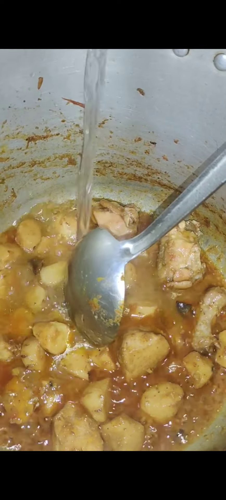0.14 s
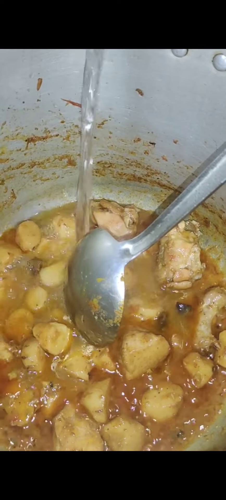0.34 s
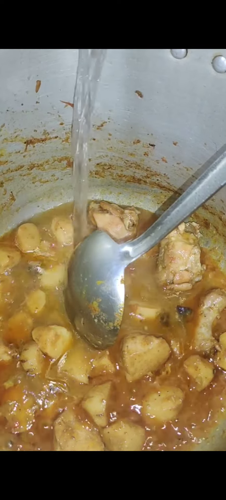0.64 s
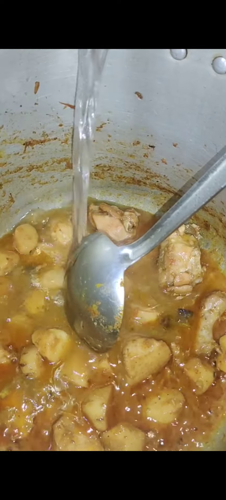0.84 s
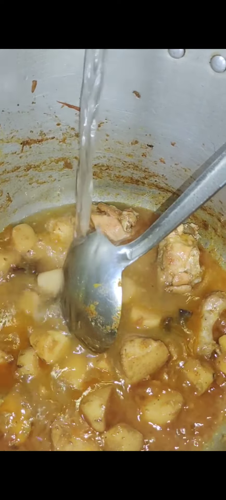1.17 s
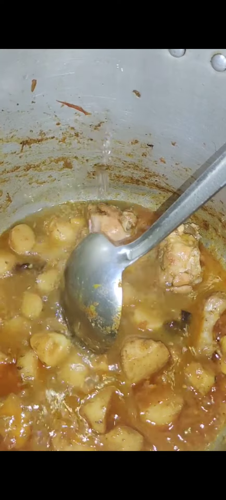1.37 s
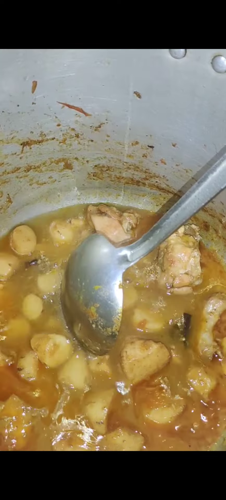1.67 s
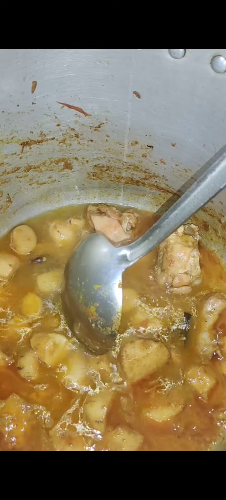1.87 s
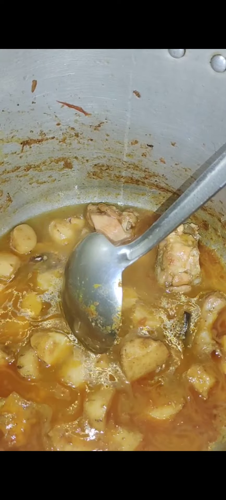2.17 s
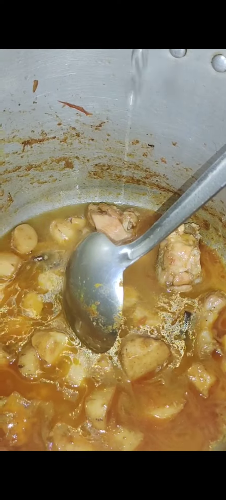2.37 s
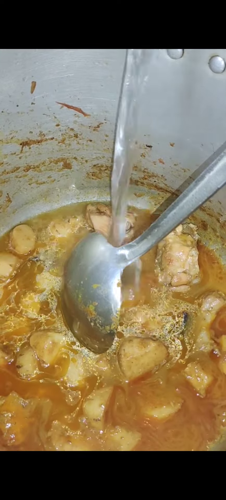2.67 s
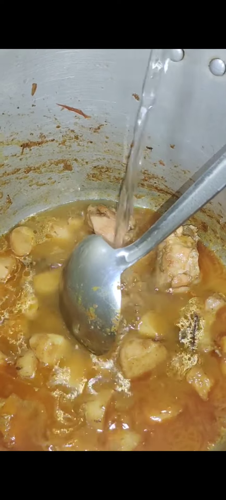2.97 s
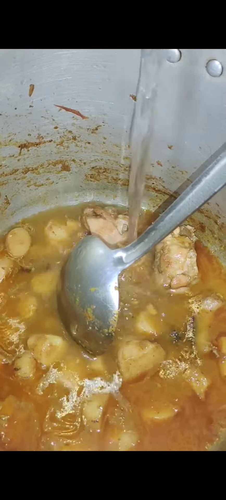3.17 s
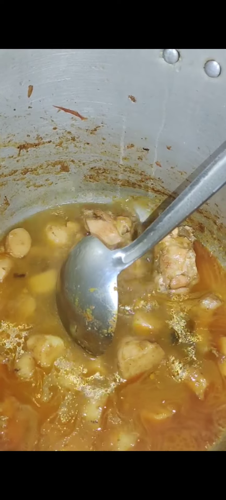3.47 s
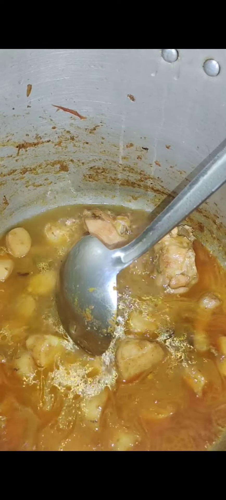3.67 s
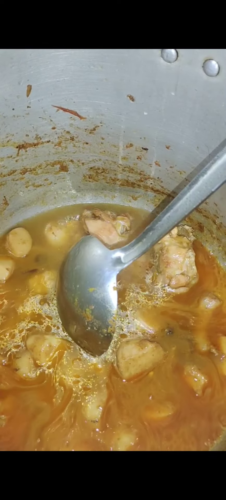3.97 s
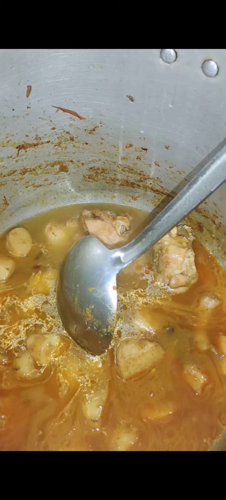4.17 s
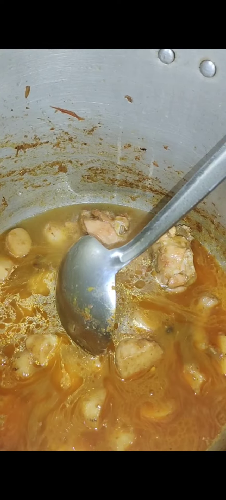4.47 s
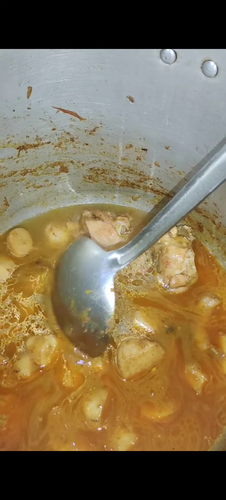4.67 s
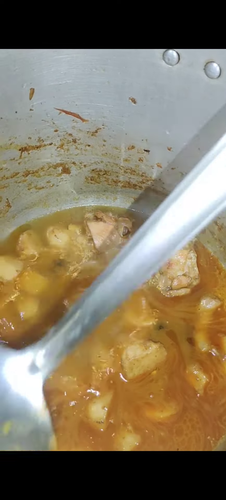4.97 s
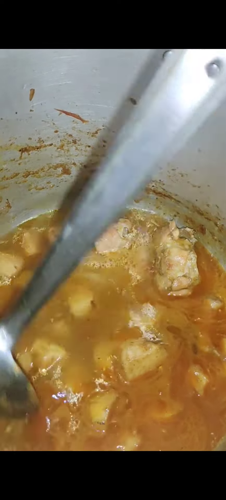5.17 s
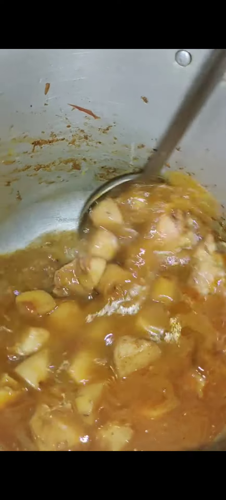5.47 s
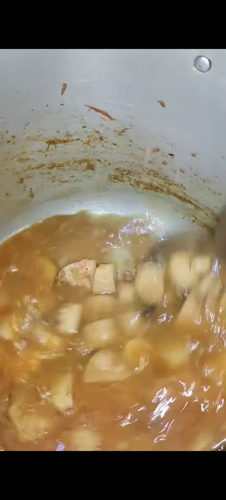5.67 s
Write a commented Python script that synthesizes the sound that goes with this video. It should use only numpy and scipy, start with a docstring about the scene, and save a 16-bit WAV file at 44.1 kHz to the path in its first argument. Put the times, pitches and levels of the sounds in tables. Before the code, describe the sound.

Very close to a metal pot: a crisp, bubbling stream for a second and a half, a short dribble and lull, then a second, slightly fuller-ringing pour. Low wind-like rumble buffets the microphone, most heavily just after the second pour. Next come a hard steel clang, smaller clinks, grating scrapes, a wet swish of stew and a final cluster of bright clanks, over quiet room rush.

```python
"""Water pours into a steel pot of stew, runs thin, then pours again in a small kitchen.
Spatter is short noise bursts; bubbles are decaying sines that rise in pitch.
Puffs of air buffet the microphone: shaped rumble with single eddy swings thudding through.
A steel ladle knocks, drags and judders: decaying modes and noise crashes, struck or rubbed.
Behind it lie a steady rush and a faint hum."""
import sys
import numpy as np
from scipy import signal
from scipy.fft import rfft, irfft, next_fast_len
from scipy.io import wavfile

SR = 44100
rng = np.random.default_rng(int(sys.argv[2]) if len(sys.argv) > 2 else 0)


def digitize_waveform(pressure):
    """Quantize a signal to 16-bit integers and store it at the path in sys.argv[1].

    Rows of a 2-D input are taken as channels; values are limited to [-1, 1].
    """
    field = np.atleast_2d(pressure).T
    bounded = np.clip(field, -1, 1)
    quanta = np.round(bounded * 32767).astype(np.int16)
    wavfile.write(sys.argv[1], SR, quanta)


N = 257176
TIME = np.arange(N) / SR
CUTOFF_HZ = 15500

# two pours: (time [s], relative spatter level [dB], relative bubble level [dB])
POUR = [
    [(0.0, -49, -43.5), (0.396, -54.5, -60), (0.58, -50.5, -62), (0.698, -58.5, -54), (1.002, -45, -48.5),
     (1.1, -47.5, -48), (1.342, -45.5, -50), (1.504, -50, -52), (1.58, -69, -70)],
    [(2.62, -65, -70), (2.654, -57, -73), (2.686, -59, -53), (2.822, -47.5, -43.5), (3.17, -60, -61),
     (3.196, -53.5, -54), (3.368, -58.5, -56), (3.518, -46.5, -46), (3.58, -81, -93)],
]
# thread of water between the pours: (start [s], end [s], relative level [dB])
DRIBBLE = (1.55, 1.87, -61.5)
DRIBBLE_SWELL_S, DRIBBLE_FADE_S = 0.17, 0.14
DRIPS_PER_S, DRIP_RELATIVE_DB = 16, -43
# stew washing round the moving ladle: (time [s], relative level [dB])
SLOSH = [(5.19, -74), (5.204, -52), (5.486, -50), (5.494, -36), (5.594, -51.5), (5.612, -48), (5.665, -54)]
# bubbles ring more freely as the water deepens: (time [s], share of full ring time [1])
DEPTH = [(1.5, 0.65), (2.7, 1.0)]
# clearest single bubbles: (time [s], relative level [dB], starting pitch [Hz])
PLINKS = [(.117, -35, 6770), (.2578, -28.5, 7300), (.314, -31, 3950), (0.5363, -30, 7100),
          (0.5646, -28, 6950), (0.787, -33.5, 4100), (0.907, -22, 6700), (0.961, -30, 7230),
          (0.9824, -23, 4170), (1.139, -22, 7500), (1.2352, -26.5, 4320), (1.28, -25, 4000),
          (1.32, -24, 7000), (1.351, -30, 5750), (1.391, -28, 6700), (2.5895, -34, 6900),
          (2.7703, -28, 3050), (2.823, -28.5, 4000), (2.8917, -31.5, 3900), (2.9657, -34, 4600),
          (3.271, -35, 5200), (3.312, -34.5, 3040), (3.4297, -34, 3260), (3.4447, -27, 5170)]
# loudest drops landing: (time [s], relative level [dB])
DROPS = [(0.908, -24), (.982, -26), (1.235, -32), (1.28, -28), (1.335, -25), (1.491, -26), (2.572, -37),
         (2.592, -33), (2.635, -34), (2.92, -28), (3.2, -34), (3.379, -35), (5.064, -38), (5.555, -34)]
# spectrum of the spatter: (frequency [Hz], relative density [dB per Hz])
SPATTER_COLOUR = [(400, -20), (1500, 2.5), (2600, -2.5), (3600, 1), (5500, -2), (7200, 6), (9000, -11),
                  (12000, -17), (15500, -32)]
# spectrum of the finest bubbles: (frequency [Hz], relative density [dB per Hz])
FIZZ_COLOUR = [(1200, -13), (2600, -11.5), (3600, -1.5), (5500, 7), (7200, 3.5), (9000, 2.5), (12000, -6.5)]
# spectrum of the poured bubbles: (frequency [Hz], relative density [dB per Hz])
BUBBLE_COLOUR = [(900, -28), (1900, -1.5), (2600, -10.5), (3400, 5), (4200, 1.5), (5500, 2), (7500, -9),
                 (10000, -17)]
# spectrum of larger bubbles gurgling round the ladle: (frequency [Hz], relative density [dB per Hz])
GURGLE_COLOUR = [(1000, -9), (1900, 9), (2600, -8), (4000, -6), (7000, -14), (10000, -20)]
# spectrum of a drop's tick: (frequency [Hz], relative density [dB per Hz])
DROP_COLOUR = [(1500, -25), (3500, -6), (5500, -2), (7500, 7.5), (9500, -8), (13000, -18.5), (15500, -31)]

# ladle blows: (time [s], relative pot floor, ladle and pot wall levels [dB] x 3, chatter decay [s])
KNOCKS = [(4.2055, -11.5, -41, -38, 0.0098), (4.434, -32.5, -44.5, -52, 0.037),
          (5.091, -37, -17.5, -55, 0.01), (5.0995, -63, -18.5, -39, .0066), (5.107, -41, -29.5, -56, .0053),
          (5.676, -29, -19.5, -16, .01), (5.7105, -58, -42, -18.5, 0.0058), (5.7155, -39, -37, -19, 0.0047),
          (5.7215, -42, -24.5, -43, .003)]
# ladle strokes along the steel: (start [s], end [s], relative ladle level [dB], relative wall level [dB])
RUBS = [(4.76, 4.82, -41, -50), (5.185, 5.46, -54, -57), (5.433, 5.635, -43, -50.5),
        (5.669, 5.717, -46, -21), (5.725, 5.781, -25, -26.5)]
RUB_ATTACK_S, RUB_RELEASE_S = 0.011, 0.013
# ladle bowl dragging over the pot floor: (start [s], end [s], relative level [dB])
DRAGS = [(4.423, 4.443, -29.5), (4.756, 4.793, -34), (5.228, 5.446, -47.5), (5.423, 5.552, -34.5),
         (5.575, 5.646, -36.5), (5.649, 5.83, -43)]
DRAG_ATTACK_S, DRAG_RELEASE_S = 0.012, 0.006
# ladle settling on the steel and damping it: (start [s], end [s], loss [dB])
PRESSES = [(4.303, 4.388, 5), (5.726, 5.824, 10)]
PRESS_ATTACK_S, PRESS_RELEASE_S = 0.009, 0.015
# stick-slip judder on the wall: (start [s], end [s], peak level [dB])
JUDDER = (5.68, 5.721, -20)
JUDDER_HZ, JUDDER_SWELL_S, JUDDER_RELEASE_S = 681, 0.028, 0.004
# pot floor modes: (frequency [Hz], relative level [dB], t60 [s])
FLOOR_MODES = [(289.8, 2.5, 0.45), (319, -22, 0.2), (363, -10, 0.08), (430, -12, 0.065), (469, -12, 0.091),
               (520.6, -0.5, 0.13), (584, -13, 0.12), (682, 2.5, 0.067), (757, -2.5, 0.36), (830, -9, 0.32),
               (986.6, 3.5, 0.34), (990, 7.5, 0.12), (1048, -18, 0.41), (1157, -19, 0.27),
               (1405, -23, 0.32), (1570, -12.5, 0.31), (3644, -8, 0.12), (3700, -17.5, 0.18),
               (3840, -22, 0.2), (5130, -12.5, 0.12), (5160, -19, 0.17), (5600, -16.5, 0.15),
               (6180, -19, 0.12), (6600, -13, 0.089), (7000, -12, 0.23), (7200, -12, 0.1),
               (7130, -4, 0.097), (8150, -12, 0.099), (8860, -12, 0.075)]
# ladle modes: (frequency [Hz], relative level [dB], t60 [s])
LADLE_MODES = [(368, -3, 0.12), (623.5, -7, 0.4), (980, -27, .15), (1160, -13, 0.2), (1324, 4.5, 0.12),
               (1548, -8, 0.33), (1574, -8, 0.18), (1700, -19, 0.12), (2010, -18, 0.14), (1970, -16, 0.23),
               (2063, 12, 0.097), (2065, 1.5, 0.2), (2319, 9.5, 0.15), (2510, -18, 0.2), (2772, 1, 0.38),
               (3100, -10, 0.25), (3450, -15, 0.22), (4000, -7, 0.08), (4700, -23, 0.18),
               (6760, 8.5, 0.035)]
# pot wall modes: (frequency [Hz], relative level [dB], t60 [s])
WALL_MODES = [(679, 8, 0.13), (1526, -4.5, 0.57), (2020, -5.5, 0.27), (2140, -14, 0.17), (2480, -7.5, 0.14),
              (3450, -5, 0.32), (3550, -2, 0.22), (3630, -5, 0.24), (3574, -1.5, 0.12), (3840, 2, 0.23),
              (3960, -5, .14), (4100, -34, .16), (4100, 4.5, 0.068), (4225, 7.5, 0.1), (4480, 2, 0.15),
              (5260, 1, 0.14), (5560, -17, 0.2), (5820, -9, 0.14), (5850, 3, 0.089), (7300, -3, 0.083),
              (7110, -11, 0.11)]
# modes sounded by the drag: (frequency [Hz], relative level [dB], t60 [s])
DRAG_MODES = [(159, -3.5, 0.025), (286, -2, 0.39), (330, 1, 0.11), (417, -12, 0.21), (866, -7, 0.18),
              (950, -6, 0.047), (1717, -15, 0.14)]
# spectrum of the floor crash: (frequency [Hz], relative density [dB per Hz])
FLOOR_COLOUR = [(100, -6.5), (220, -2.5), (330, 5.5), (750, 4.5), (1200, -11), (2200, -13), (3000, -27),
                (3700, -9), (4300, -22), (7200, -9), (9000, -18), (15000, -28)]
# spectrum of the ladle crash: (frequency [Hz], relative density [dB per Hz])
LADLE_COLOUR = [(120, -34), (350, -11), (900, -3.5), (1400, -1.5), (2400, 3), (3300, -5), (5500, -14.5),
                (7200, -9.5), (9000, -20), (15000, -48)]
# spectrum of the wall crash: (frequency [Hz], relative density [dB per Hz])
WALL_COLOUR = [(150, -26), (650, 5), (1150, -21), (2300, 3), (3100, -3.5), (4000, 8.5), (5000, -1),
               (5900, 6.5), (7500, -4), (9000, -15), (15000, -42)]

# puffs of air on the microphone: (start [s], peak [s], end [s], relative level [dB])
PUFFS = [(0.502, 0.96, 1.286, -21), (1.266, 1.307, 1.43, -34.5), (1.457, 1.52, 1.534, -27.5),
         (1.618, 1.672, 1.96, -42.5), (3.392, 3.724, 3.9, -18), (3.918, 3.95, 4.1, -35),
         (5.773, 5.8, 5.9, -27.5)]
PUFF_SHAPE = 0.84  # power of the rise and fall; under 1 is rounder
# strong eddies: (time [s], relative level [dB], nominal pitch [Hz])
EDDIES = [(0.669, -28, 100), (.895, -18.5, 130), (0.93, -17, 110), (1.167, -25, 90), (1.205, -23.5, 90),
          (3.428, -19, 125), (3.552, -19, 164), (3.592, -16.5, 172), (3.633, -15, 115), (3.679, -13.5, 130),
          (3.724, -12, 115), (3.77, -22.5, 134), (3.811, -12.5, 150), (3.881, -22, 150)]
# lesser eddies: level relative to the puff's strength
EDDIES_PER_S, EDDY_RELATIVE_DB, EDDY_MID_HZ = 22, -1, 130
# spectrum of the air rumble: (frequency [Hz], relative density [dB per Hz])
AIR_COLOUR = [(25, -42), (50, -32), (85, 1), (150, -2.5), (250, -10.5), (400, -24.5), (700, -36.5),
              (1500, -33.5), (4000, -64)]

# spectrum of the room's rush: (frequency [Hz], relative density [dB per Hz])
ROOM_TONE = [(25, -41), (50, -17.5), (80, -7), (125, -12.5), (165, 0), (225, -9), (330, -4.5), (500, -8.5),
             (560, -13.5), (1100, -17.5), (2100, -23.5), (2700, -29.5), (5500, -37), (7100, -30.5),
             (9500, -46), (15500, -49)]
ROOM_TONE_DB = -44.5
# faint hum and whine: (frequency [Hz], rms level [dB])
HUM = [(166, -58), (198, -62.5), (577, -62.5), (3480, -75), (4590, -77.5)]


def water():
    """Droplets burst into hisses on the food and trap ringing bubbles; stirred stew does the same."""
    wobble = from_db(1.76 * drift(25.14))
    spatter_gain, bubble_gain = np.sum([levels(rows) for rows in POUR], axis=0) * wobble
    start, end, db = DRIBBLE
    dribble_gain = from_db(db) * stroke(start, end, DRIBBLE_SWELL_S, DRIBBLE_FADE_S)
    slosh_gain = levels(SLOSH)[0] * from_db(-1.5 + 2.0 * drift(30))  # the stew moves in lumps

    impacts = np.abs(grains(per_s=980, spread_db=7.0))
    bursts = signal.lfilter([1], [1, -np.exp(-1 / (0.005 * SR))], impacts)  # 5 ms decay
    spatter = coloured(bursts * rng.standard_normal(N), SPATTER_COLOUR)
    fizz = bubble_cloud(FIZZ_COLOUR, cycles=57, rise=0.16, spread_db=6.0, count=3600)
    bubbles = bubble_cloud(BUBBLE_COLOUR, cycles=99, rise=0.13, spread_db=3.5, count=2800)
    gurgle = bubble_cloud(GURGLE_COLOUR, cycles=41, rise=0.1, spread_db=3.5, count=2400)

    out = (from_db(1.04) * spatter + from_db(-3.9) * fizz) * (spatter_gain + slosh_gain + dribble_gain)
    out += from_db(-2.0) * bubbles * (bubble_gain + dribble_gain)
    return out + from_db(-3.5) * gurgle * slosh_gain


def bubble_cloud(colour, cycles, rise, spread_db, count):
    """Many small bubbles at random moments and pitches; rms 1."""
    out = np.zeros(N)
    when, pitch, size = rng.random((count, 3)).T
    when = when * N / SR
    gains = from_db(spread_db * np.minimum(-np.log(1 - size), 3))
    pitches_hz = 1000 * 11 ** pitch
    depths = np.interp(when, *np.transpose(DEPTH))
    for s, gain, hz, depth in zip(when, gains, pitches_hz, depths):
        add(out, s, gain * bubble(hz, cycles * depth, rise))
    return coloured(out, colour)


def bubble(hz, cycles, rise):
    """A trapped bubble rings and dies, its pitch rising as it nears the surface."""
    t60 = cycles / hz
    t = np.arange(int(t60 * SR) + 2) / SR
    return np.sin(2 * np.pi * hz * t * (1 + rise * t / t60)) * np.exp(-np.log(1000) * t / t60)


def drops():
    """Large bubbles plink; drops tick on the stew, and fall at random from the dribble."""
    out = np.zeros(N)
    t = np.arange(SR // 50) / SR
    for s, db, hz in PLINKS:
        depth = np.interp(s, *np.transpose(DEPTH))
        add(out, s, from_db(db - 2.5) * bubble(hz, cycles=70 * depth, rise=0.036))
    start, end, _ = DRIBBLE
    drip_times = moments(start + DRIBBLE_SWELL_S, end + DRIBBLE_FADE_S, DRIPS_PER_S)
    drips = [(s, DRIP_RELATIVE_DB) for s in drip_times]
    for s, db in DROPS + drips:
        tick = coloured(rng.standard_normal(len(t)), DROP_COLOUR) * np.exp(-t / 0.0036)
        add(out, s, from_db(db - 11.0) * tick)
    return out


def ladle():
    """Blows and rubbing set the pot's floor, the ladle and the pot's wall ringing."""
    pot_floor = steel(FLOOR_MODES, FLOOR_COLOUR, ring_db=1.0, crash_db=-1.5, crash_t60=0.08,
                      tail_db=-11.0, tail_t60=0.59, build_s=0.0013)
    spoon = steel(LADLE_MODES, LADLE_COLOUR, ring_db=-1.5, crash_db=-0.5, crash_t60=0.062,
                  tail_db=-19, tail_t60=0.27, build_s=0.0019)
    wall = steel(WALL_MODES, WALL_COLOUR, ring_db=-0.5, crash_db=1.0, crash_t60=0.06,
                 tail_db=-20, tail_t60=0.2, build_s=0.00029)
    slips = grains(per_s=2100, spread_db=2.0)
    spoon_gain, wall_gain = sum(
        np.outer(from_db(db), stroke(start, end, RUB_ATTACK_S, RUB_RELEASE_S)) for start, end, *db in RUBS)
    drag_gain = sum(
        from_db(db) * stroke(start, end, DRAG_ATTACK_S, DRAG_RELEASE_S) for start, end, db in DRAGS)
    scrape = rubbed(spoon[0] + from_db(1.0) * spoon[1], slips, spoon_gain, contact_t60=0.99)
    scrape += rubbed(wall.sum(axis=0), slips, wall_gain, contact_t60=0.11)
    drag = rubbed(ringing(DRAG_MODES), slips, drag_gain, contact_t60=0.29)

    # pressed against the pot, the ladle chokes the ringing
    loss_db = sum(
        loss * stroke(start, end, PRESS_ATTACK_S, PRESS_RELEASE_S) for start, end, loss in PRESSES)
    struck = knocks(np.array([pot_floor, spoon, wall]))
    out = (struck + scrape) * from_db(-loss_db) + drag + judder()
    # the steel sounds carry no deep bass
    return signal.sosfilt(signal.butter(2, 110, "high", fs=SR, output="sos"), out)


def knocks(bodies):
    """Each blow sets the clear modes ringing; a quick run of fading rebounds feeds the crash."""
    out = np.zeros(N)
    t = np.arange(SR // 20) / SR
    for s, *blow_db, chatter_s in KNOCKS:
        clear, crash = np.tensordot(from_db(blow_db), bodies, 1)
        hits = rng.choice([-1, 1], len(t)) * (rng.random(len(t)) < 2500 / SR)
        rebounds = 0.091 * hits * np.exp(-t / chatter_s)
        rebounds[0] = 1  # the blow itself
        add(out, s, clear)
        add(out, s, signal.fftconvolve(rebounds, crash))
    return out


def judder():
    """Stick-slip on the wall: a swelling tone with an unsteady phase."""
    start, end, db = JUDDER
    phase = 2 * np.pi * JUDDER_HZ * TIME + 0.26 * drift(120)
    return from_db(db) * stroke(start, end, JUDDER_SWELL_S, JUDDER_RELEASE_S) * np.sin(phase)


def steel(modes, colour, ring_db, crash_db, crash_t60, tail_db, tail_t60, build_s):
    """Two responses of a body: its clear modes, and a crash of crowded ones that dulls as it dies."""
    clear = ringing(modes)
    t = np.arange(len(clear)) / SR
    crowded = coloured(rng.standard_normal(len(t)), colour)
    dulled = signal.sosfilt(signal.butter(1, 3500, fs=SR, output="sos"), crowded[::-1])
    crash = crowded * from_db(crash_db - 60 * t / crash_t60)
    tail = dulled * from_db(tail_db - 60 * t / tail_t60)
    # bending waves take a moment to fill the sheet
    return np.array([from_db(ring_db) * clear, crash + tail]) * (1 - np.exp(-t / build_s))


def ringing(modes):
    """Response of a body's clear modes to one tap: decaying sines of alternating sign."""
    t = np.arange(SR * 3 // 4) / SR
    power = sum(from_db(db) ** 2 for hz, db, t60 in modes) / 2
    out = np.zeros(len(t))
    for k, (hz, db, t60) in enumerate(modes):
        out += (-1) ** k * from_db(db - 60 * t / t60) * np.sin(2 * np.pi * hz * t)
    return out / np.sqrt(power)


def rubbed(response, slips, force, contact_t60):
    """A body kept sounding by a stream of small slips, and damped by the contact."""
    damped = response * np.exp(-np.log(1000) * np.arange(len(response)) / SR / contact_t60)
    return signal.fftconvolve(slips * force, damped / np.linalg.norm(damped))[:N]


def air():
    """Turbulence at the microphone port: a lumpy rumble with single eddies thudding through it."""
    strength = np.zeros(N)
    for start, peak, end, db in PUFFS:
        strength += from_db(db) * np.interp(TIME, [start, peak, end], [0, 1, 0]) ** PUFF_SHAPE
    out = from_db(-5.0) * strength * coloured(grains(per_s=900, spread_db=2.5), AIR_COLOUR)

    half_s = 0.02
    eddies = [(s, from_db(db), hz) for s, db, hz in EDDIES]
    for s in moments(0, N / SR, EDDIES_PER_S):
        gain = from_db(EDDY_RELATIVE_DB) * strength[int(s * SR)]
        eddies.append((s, gain, EDDY_MID_HZ * rng.uniform(0.69, 1.5)))
    for s, gain, hz in eddies:
        # an eddy sucks, then pushes; the smaller it is, the sharper the swing
        u = 2 * np.pi * hz * np.arange(-half_s, half_s, 1 / SR)
        swing = u / (1 + u * u) ** 2
        add(out, s - half_s, gain * swing / swing.max())
    return signal.sosfilt(signal.butter(3, [56, 900], "band", fs=SR, output="sos"), out)


def room_tone():
    """The kitchen's steady rush (shaped noise) with a faint hum of sines wandering in phase."""
    out = from_db(ROOM_TONE_DB) * coloured(rng.standard_normal(N), ROOM_TONE)
    for hz, db in HUM:
        out += from_db(db) * np.sqrt(2) * np.sin(2 * np.pi * hz * TIME + 0.77 * drift(12))
    return out


def echoes(x, t60, wet_db):
    """Direct sound plus a dense dying cloud of reflections."""
    t = np.arange(SR // 2) / SR
    cloud = rng.standard_normal(len(t)) * np.exp(-np.log(1000) * t / t60) * (t > 0.001)
    return x + from_db(wet_db) * signal.fftconvolve(x, cloud / np.linalg.norm(cloud))[:N]


def from_db(db):
    """Decibels to gain."""
    return 10 ** (np.asarray(db) / 20)


def rms_one(x):
    """Scale to an rms of 1."""
    return x / np.sqrt(np.mean(x ** 2) + 1e-20)


def levels(rows):
    """One gain curve for each dB column, all but silent outside the rows."""
    s, *columns = np.transpose(rows)
    return [from_db(np.interp(TIME, s, c, left=-140, right=-140)) for c in columns]


def stroke(start, end, attack_s, release_s):
    """Envelope of one gesture: linear rise, hold until the end, exponential decay."""
    return np.clip((TIME - start) / attack_s, 0, 1) * np.exp(-np.clip((TIME - end) / release_s, 0, 20))


def moments(start, end, per_s):
    """Random times between start and end."""
    return TIME[(rng.random(N) < per_s / SR) & (TIME > start) & (TIME < end)]


def grains(per_s, spread_db):
    """Random clicks of uneven size; rms 1."""
    sizes = from_db(spread_db * np.minimum(rng.exponential(1, N), 4)) * rng.choice([-1, 1], N)
    return rms_one(sizes * (rng.random(N) < per_s / SR))


def drift(per_s):
    """Slow random wander with an rms of 1."""
    knots = rng.standard_normal(4096)
    return rms_one(np.interp(TIME * per_s, np.arange(len(knots)), knots))


def coloured(x, colour):
    """Filter by a spectrum drawn on a log-frequency axis; rms 1."""
    hz, db = np.transpose(colour)
    size = next_fast_len(len(x))
    bins_hz = np.maximum(np.arange(size // 2 + 1) * SR / size, 1)
    skirt = np.minimum(bins_hz / hz[0], 1) ** 2  # falls away below the first point
    gain = skirt * from_db(np.interp(np.log(bins_hz), np.log(hz), db))
    return rms_one(irfft(rfft(x, size) * gain, size)[:len(x)])


def add(out, s, sound):
    """Mix a sound in at a time in seconds."""
    at = max(int(s * SR), 0)
    out[at:at + len(sound)] += sound[:max(N - at, 0)]


def scene():
    """Pot sounds echo in the kitchen; air is right at the microphone."""
    pot = water() + drops() + ladle()
    return (echoes(pot, t60=0.31, wet_db=-11.5) + air() + room_tone())[None]


def record(dry):
    """Round the loudest peaks, then cut the top of the spectrum."""
    ceiling = 0.62
    rounded = dry / (1 + (dry / ceiling) ** 4) ** (1 / 4)
    return signal.sosfilt(signal.ellip(10, 0.1, 80, CUTOFF_HZ, fs=SR, output="sos"), rounded)


dry = scene()
out = record(dry)
digitize_waveform(out)
```